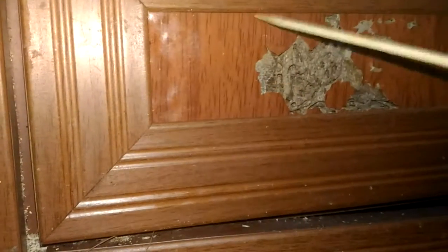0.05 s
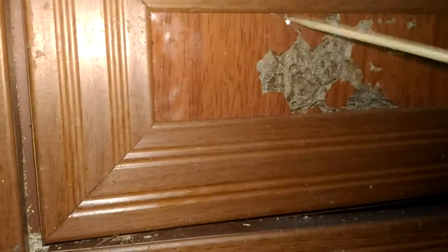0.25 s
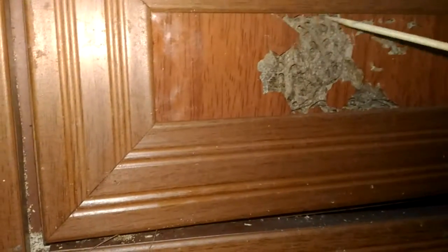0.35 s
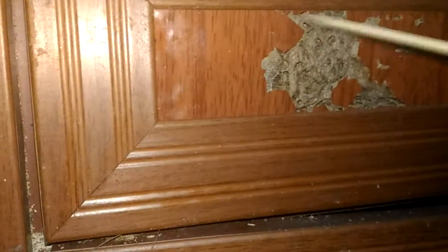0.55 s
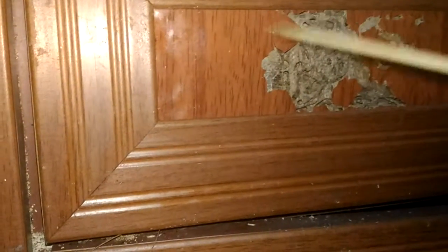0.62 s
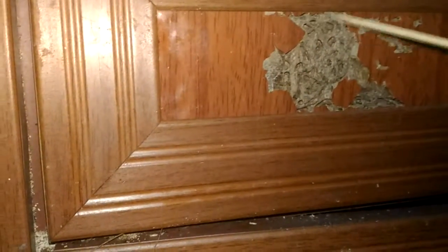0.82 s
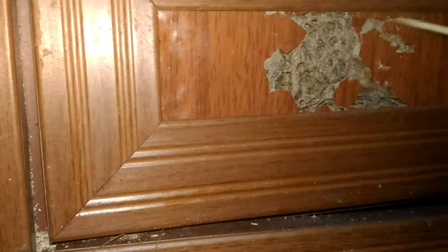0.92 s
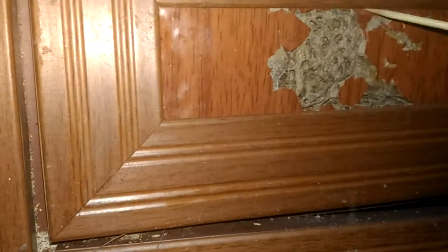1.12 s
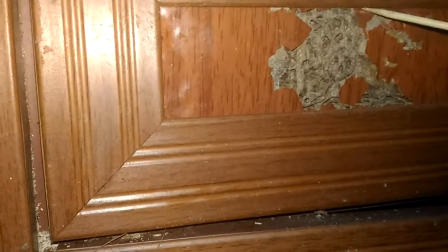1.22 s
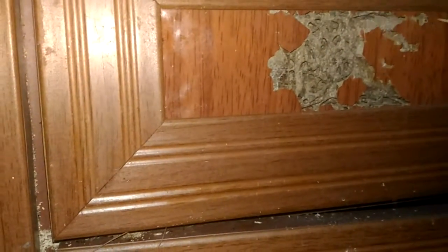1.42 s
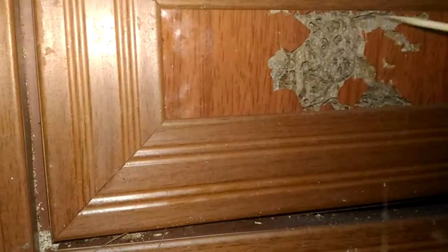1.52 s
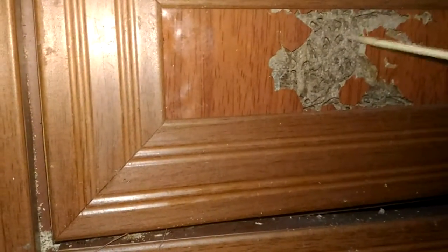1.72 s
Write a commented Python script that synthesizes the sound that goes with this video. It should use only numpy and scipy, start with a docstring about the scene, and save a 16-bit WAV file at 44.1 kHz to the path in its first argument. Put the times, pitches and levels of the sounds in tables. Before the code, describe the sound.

Dry, brittle wood crackling and snapping close up, with faint scratches from a poking skewer.

```python
"""Thin, brittle veneer cracks as a wooden skewer picks at a hollow door panel, close to the microphone.
In three strokes it splinters in runs of dry cracks, each a sharp click amid tiny tearing fibres.
Every crack knocks the panel, which rings briefly, and two long splinters twang as they break free.
The tip scratches faintly between the cracks, in a small quiet room with a low rumble."""
import sys
import numpy as np
from scipy import signal
from scipy.fft import rfft, irfft
from scipy.io import wavfile

SR = 44100
rng = np.random.default_rng(int(sys.argv[2]) if len(sys.argv) > 2 else 0)


def generate_wav(signal):
    """Clip the signal to [-1, 1] and save it as 16-bit WAV at the path in sys.argv[1]."""
    frames = np.transpose(np.atleast_2d(signal))
    scaled = np.clip(frames, -1, 1) * 32767
    pcm = np.round(scaled).astype(np.int16)
    wavfile.write(sys.argv[1], SR, pcm)


N = 77175

# cracks: t/s, treble level/dB, spread in time/s, low thud/dB, panel knock/dB, mid bite/dB, lean left/dB
VENEER_CRACKS = [(0.006, -46, 0.0075, 26.5, 9.5, 8, -8), (0.013, -47.5, 0.0019, 8, 10.5, 7.5, 12),
                 (0.095, -39, 0.002, -14, -25, -4.5, -5.5), (0.218, -41.5, 0.00075, 13.5, 15, 3, 2),
                 (0.2385, -22, 0.00038, -10.5, 13.5, -8, -6), (0.2425, -28, 0.0002, 0.5, 17.5, 4, 0),
                 (0.2436, -17, 0.00016, -22.5, -32, -10.5, 5), (0.2561, -20.5, 0.0008, -3.5, -3, -0.5, -4),
                 (0.338, -42, 0.003, 20, 22.5, 7, -3), (0.3494, -20.5, 0.0007, -8.5, 5, -17.5, 9),
                 (0.3519, -20.5, 0.002, 4, -2, -6, -3.5), (0.367, -27, 0.003, -13, 1, -4, -7),
                 (0.3728, -20.5, 0.00037, -17, 4, -5.5, 1), (0.3765, -24.5, 0.0005, -8, 6.5, 2.5, -5),
                 (0.3799, -20, 0.0008, -11, -11, -1, -3), (0.4011, -37.5, 0.003, 19.5, -8, 0, -15),
                 (0.4088, -21, 0.0008, -12.5, 6.5, -5, 2), (0.411, -27, 0.0014, -13, 6, 6.5, -5),
                 (0.443, -33, 0.0012, -10, -24, 0, 3), (0.4499, -30, 0.0013, 11.5, -22, 2, -6),
                 (0.4591, -26.5, 0.0032, 8.5, -13, -8.5, -10.5), (0.4621, -28, 0.0014, 18, 9.5, 8, -3.5),
                 (0.5339, -24.5, 0.0011, -3.5, 7, 2, -8), (0.7808, -46.5, 0.0011, 8, 18, 4.5, 1.5),
                 (0.827, -43, 0.0003, 3, 3.5, -9, -1.5), (0.868, -30.5, 0.00053, -15, -19, -13, 0),
                 (0.8756, -35.5, 0.002, 8, 9.5, 6.5, 2), (0.8953, -24, 0.0006, -6, -2, -14, -3.5),
                 (0.902, -32.5, 0.0034, -8, 7, 12, -2), (0.9237, -19.5, 0.001, -1, 13.5, 1, -3.5),
                 (0.926, -22, 0.0015, 2.5, 1, 7, 10), (0.939, -32, 0.0015, 16, -9, -1, -13),
                 (0.9509, -27, 0.0002, 0, 0, -2, -13), (0.9764, -31, 0.0008, 12.5, 5.5, 3, -11),
                 (0.995, -24, 0.0011, -14, 12.5, 2, -6.5), (1.0084, -23, 0.0009, -8, -8, -7.5, 0),
                 (1.017, -36, 0.002, -16, -10, 11.5, -7), (1.0224, -23, 0.001, 2, 2, 0, -3),
                 (1.048, -25, 0.0022, 1, 0, -5, -7), (1.0518, -22, 0.0012, 2.5, -0.5, 6.5, -4),
                 (1.279, -39.5, 0.00066, 0, 3.5, -3, 0), (1.2901, -34, 0.00032, 10.5, -11, -3, -3.5),
                 (1.2946, -40.5, 0.0012, 27, 10, 3.5, -3), (1.3502, -49, 0.00091, 8, 14.5, 9, -2),
                 (1.357, -38.5, 0.0029, 6, 3, 4, -8), (1.3806, -24.5, 0.0011, -5, 4.5, 0, -2),
                 (1.3956, -27, 0.0016, -3, -3, -0.5, -9), (1.397, -28, 0.0011, 8.5, -1, -5, 0),
                 (1.409, -34.5, 0.0014, -1, 1, 2, 16.5), (1.4185, -22, 0.0015, 6.5, -1.5, -7, -4),
                 (1.4276, -19.5, 0.0015, -4, -11, -1, -9), (1.4288, -20, 0.0013, 2.5, 3, 11, -4.5),
                 (1.485, -18.5, 0.0026, 4, -8.5, 0, -5), (1.489, -31.5, 0.0015, 14, 10, 2.5, 3),
                 (1.53, -38.5, 0.004, 13, -3, 2, -3)]
# tone of snapping veneer: f/Hz, level/dB
VENEER_TONE = [(35, -60), (60, -27), (146, -28), (262, -23), (553, -14.5), (1090, -7), (1340, -9),
               (2580, -9.5), (3340, -5.5), (5090, -5), (5460, -4), (6740, 1.5), (11300, -15.5),
               (13300, -23), (14600, -48), (16000, -44)]
# the pitch of the knock depends on where the tip presses: t/s, f/Hz
KNOCK_PITCH = [(.25, 822), (.35, 800), (.38, 1026), (.41, 1050), (.46, 735), (.53, 1180), (1.05, 1010),
               (1.3, 763), (1.48, 970)]
# long splinters breaking free: t/s, level/dB
SPLINTER_TWANGS = [(0.9244, -18.5), (1.0225, -30)]
# notes of a long splinter: f/Hz, level/dB, time to fade by 60 dB/s
SPLINTER_NOTES = [(3364, -4.5, 0.038), (3983, -2, 0.019), (5090, 2.5, 0.01), (5710, -5, .014)]
# scratches of the tip: start/s, end/s, level/dB
TIP_SCRATCHES = [(0, 0.045, -56.5), (0.316, 0.334, -52.5), (0.365, 0.455, -44.5), (0.838, 0.882, -56.5),
                 (0.851, 0.927, -50.5), (0.933, 1.05, -49), (1.11, 1.172, -64.5), (1.346, 1.41, -46),
                 (1.48, 1.535, -46.5), (1.625, 1.677, -65.5), (1.676, 1.708, -60)]
# notes of the door: f/Hz, level/dB, time to fade by 60 dB/s
DOOR_NOTES = [(244.5, -19.5, 0.16), (885, -34.5, 0.027), (3997, -20, 0.029)]
# how long the panel and the room ring on: f/Hz, time to fade by 60 dB/s
PANEL_FADE = [(200, 0.11), (1000, 0.054), (7000, 0.042), (13000, 0.011)]
ROOM_FADE = [(250, 0.75), (800, 0.39), (3000, 0.32), (7500, 0.26), (11000, 0.33)]
# tone of the steady room noise: f/Hz, level/dB
ROOM_TONE = [(15, -32), (25, -7), (134, -6), (263, -1), (439, -18), (503, -5), (641, -18.5), (1890, -21),
             (2610, -19), (5140, -28.5), (6740, -15), (8590, -30), (13600, -31.5), (16000, -55)]
# rise and fall of the rumble: t/s, level/dB
RUMBLE_LEVELS = [(0, -73), (.2, -72), (.38, -64), (.55, -71.5), (.75, -82), (.95, -62), (1.07, -65.5),
                 (1.25, -71.5), (1.43, -69), (1.569, -69), (1.68, -64), (1.75, -84)]
# how much louder the veneer is on the left: f/Hz, level/dB
LEFT_LEAD = [(100, 7), (600, 7.5), (3800, 14.5), (6400, 15.5), (8300, 8.5), (13000, -1.5)]
# how alike the two microphones sound: f/Hz, likeness from 0 to 1
MIC_LIKENESS = [(300, 0.95), (900, 0.9), (4000, 0.13)]

THUD_HZ, BITE_HZ, TOP_HZ = 259, 3010, 16200
FIBRES_PER_S, FIBRE_SCATTER_DB, FIBRES_DB = 16000, 4, 20.5
SLOW_TEAR_S = .005  # the spread of a slow tear, the yardstick for all cracks
SLIPS_PER_S, SLIP_SCATTER_DB, CLUMP_DB, CLUMP_S = 1500, 5, 9, .005
CRACK_DB, KNOCK_DB, PANEL_DB, ROOM_DB, STEADY_DB = -1.5, -1.5, -4.5, -20, -65


def crack(start, db, spread, thud_db, knock_db, bite_db, lean_db, size=2048):
    """The veneer snaps: one click in a cloud of tearing fibres. Returns start time and sound."""
    hz, lead = np.fft.rfftfreq(size, 1 / SR), size // 8
    t = (np.arange(size) - lead) / SR
    swell = np.exp(-abs(t) / np.where(t < 0, 0.9 * spread, spread))
    strengths = amp(FIBRE_SCATTER_DB * rng.standard_normal(size))
    breaks = rng.random(size) < FIBRES_PER_S / SR
    fibres = unit(swell * strengths * breaks * rng.standard_normal((2, size)))
    click = rfft(1. * (t == 0))
    snap = flatten(click + amp(FIBRES_DB) * np.sqrt(spread / SLOW_TEAR_S) * mic_pair(rfft(fibres), hz))
    # each splinter has its own random peaks and dips, drawn every 476.5 Hz
    peaks = np.interp(hz / 476.5, np.arange(size), rng.uniform(-1, 1, size))
    wood_db = 5 * peaks * np.minimum(hz / BITE_HZ, 1) + dulling(hz, spread)
    wood_db += thud_db * bump(hz, THUD_HZ, octaves=1) + bite_db * bump(hz, BITE_HZ, octaves=0.79)
    knock_hz = np.interp(start, *np.transpose(KNOCK_PITCH))
    wood_db += (KNOCK_DB + knock_db) * bump(hz, knock_hz, octaves=0.36)
    sound = irfft(snap * veneer_filter(hz, wood_db, lean_db))
    return start - lead / SR, amp(db + CRACK_DB) * np.sqrt(SLOW_TEAR_S * SR) * sound


def veneer_filter(hz, extra_db=0, lean_db=0):
    """The tone of the veneer at both microphones, with the left treble held at a set strength."""
    treble = hz > 5000
    left = read(VENEER_TONE, hz) + extra_db
    left -= 10 * np.log10(np.mean(amp(left) ** 2 * treble))
    right = left - read(LEFT_LEAD, hz) - lean_db * np.minimum(hz / BITE_HZ, 1)
    return causal(np.array([left, right]))


def dulling(hz, spread):
    """The slower the wood tears, the more top treble it loses (in dB)."""
    return -33 * np.sqrt(spread / SLOW_TEAR_S) * np.minimum(hz / TOP_HZ, 1) ** 8


def twang(db, size=2048):
    """A long splinter springs loose and rings for a moment."""
    t, out = np.arange(size) / SR, np.zeros((2, size))
    for hz, level, fade_s in SPLINTER_NOTES:
        sides_db = np.array([[0], [read(LEFT_LEAD, hz)]])
        rise = 1 - np.exp(-hz * t / 2)
        out += amp(db + level - sides_db - 60 * t / fade_s) * rise * np.sin(2 * np.pi * hz * t)
    return out


def scratching(size=1024):
    """The tip makes tiny slips over crumbling wood, in short clumps."""
    t, out = np.arange(N) / SR, np.zeros(N)
    kicks = amp(SLIP_SCATTER_DB * np.minimum(rng.exponential(1, N), 3)) * rng.choice([-1, 1], N)
    clumps = amp(CLUMP_DB * np.interp(t / CLUMP_S, np.arange(N), rng.uniform(-0.97, 1, N)))
    slips = unit(kicks * clumps * (rng.random(N) < SLIPS_PER_S / SR)) * np.sqrt(N)
    for start, end, db in TIP_SCRATCHES:
        progress = np.clip((t - start) / (end - start), 0, 1)
        out += amp(db) * slips * np.sqrt(abs(np.sin(np.pi * progress)))
    hz = np.fft.rfftfreq(size, 1 / SR)
    wood = irfft(veneer_filter(hz, dulling(hz, SLOW_TEAR_S)))
    return signal.fftconvolve(out[None], wood, axes=1)[:, :N]


def door_ring(x):
    """Every crack and scratch sets the door ringing at its own few notes."""
    t = np.arange(SR // 2) / SR
    ring = sum(amp(db) * unit(amp(-60 * t / fade_s) * np.cos(2 * np.pi * hz * t))
               for hz, db, fade_s in DOOR_NOTES)
    return signal.fftconvolve(x, ring[None], axes=1)[:, :N]


def echoes(x, fade_times, onset_s, count=3):
    """Echoes in the panel or room blur into a fading noise; its pattern shifts as the tip moves."""
    out, t = np.zeros((2, N)), np.arange(N) / SR
    for k in range(count):
        white = rfft(rng.standard_normal((2, SR // 2)))
        noise = irfft(mic_pair(white, np.fft.rfftfreq(SR // 2, 1 / SR)))
        hz, age, bands = signal.stft(noise, SR, nperseg=256)
        ring = signal.istft(bands * amp(-60 * age / read(fade_times, hz)[:, None]), SR, nperseg=256)[1]
        ring = unit(ring * (1 - np.exp(-(t[:ring.shape[1]] / onset_s) ** 2)))
        share = np.cos(np.pi * (t * 9 + k / count)) * np.sqrt(2 / count)  # the patterns take turns
        out += signal.fftconvolve(x * share, ring, axes=1)[:, :N]
    return out


def background():
    """Steady room noise and a low rumble that swells with the strokes, both louder on the left."""
    hz, white = np.fft.rfftfreq(N, 1 / SR), rfft(rng.standard_normal((3, N)))
    steady = unit(irfft(mic_pair(white, hz) * amp(read(ROOM_TONE, hz)), N))
    rumble = unit(irfft(white[2] * bump(hz, centre_hz=69, octaves=0.58), N))
    swell = amp(np.interp(np.arange(N) / SR, *np.transpose(RUMBLE_LEVELS)))
    return np.sqrt(N) * (amp(STEADY_DB) * steady + rumble * swell) * amp([[3.5], [-3.5]])


def mic_pair(spectra, hz, right_lag_s=.00007):
    """Makes two unrelated noises alike in the bass, as at two close microphones."""
    same = read(MIC_LIKENESS, hz)
    right = same * spectra[0] + np.sqrt(1 - same ** 2) * spectra[1]
    return np.array([spectra[0], right * np.exp(-2j * np.pi * hz * right_lag_s)])


def flatten(spectrum):
    """Evens out bass and treble but keeps the fine ripple."""
    k, total = np.arange(spectrum.shape[1]), np.cumsum(abs(spectrum) ** 2, 1)
    lo, hi = np.maximum(k * 3 // 4 - 4, 0), np.minimum(k * 5 // 4 + 4, k[-1])
    nearby_power = (total[:, hi] - total[:, lo]) / (hi - lo)
    return spectrum * causal(-10 * np.log10(nearby_power + 1e-9))


def causal(db):
    """A filter with these levels that rings after a hit, never before (minimum phase)."""
    cepstrum = irfft(np.log(amp(db)))
    half = cepstrum.shape[-1] // 2
    cepstrum[..., 1:half] *= 2
    cepstrum[..., half + 1:] = 0
    return np.exp(rfft(cepstrum))


def amp(db):
    """Turns decibels into a multiplier."""
    return 10 ** (np.asarray(db) / 20)


def unit(x):
    """Scales a sound to energy 1."""
    return x / np.sqrt(np.sum(x ** 2, -1, keepdims=True) + 1e-20)


def read(points, hz):
    """Reads between the rows of a table, along a pitch scale."""
    f, value = np.transpose(points)
    return np.interp(np.log(hz + 1), np.log(f + 1), value)


def bump(hz, centre_hz, octaves):
    """A smooth hill around one pitch."""
    return np.exp(-.5 * (np.log2((hz + 1) / centre_hz) / octaves) ** 2)


def scene():
    """Cracks, twangs and scratches ring through the door and into the room."""
    wood = scratching()
    for row in VENEER_CRACKS:
        add(wood, *crack(*row))
    for start, db in SPLINTER_TWANGS:
        add(wood, start, twang(db))
    near = wood + amp(PANEL_DB) * echoes(wood, PANEL_FADE, onset_s=0.00051) + door_ring(wood)
    dull = signal.sosfilt(signal.butter(4, 9200, fs=SR, output="sos"), near)
    return near + amp(ROOM_DB) * echoes(dull, ROOM_FADE, onset_s=0.012) + background()


def add(mix, start, sound):
    """Mixes a sound in at a start time in seconds."""
    at = round(start * SR)
    sound = sound[:, max(-at, 0):]
    part = mix[:, max(at, 0):][:, :sound.shape[1]]
    part += sound[:, :part.shape[1]]


def record(dry):
    """Cuts the bass below 45 Hz and the very highest treble."""
    thin = signal.sosfilt(signal.butter(4, 45, "high", fs=SR, output="sos"), dry)
    top_cut = signal.firwin(511, TOP_HZ, window=("kaiser", 9), fs=SR)
    return signal.oaconvolve(thin, top_cut[None], "same")


dry = scene()
out = record(dry)
generate_wav(out)
```